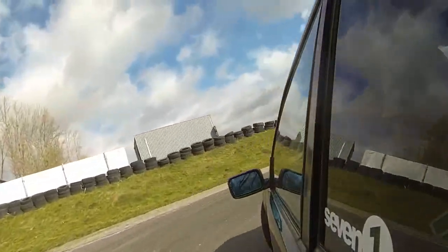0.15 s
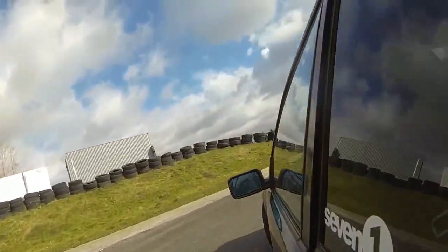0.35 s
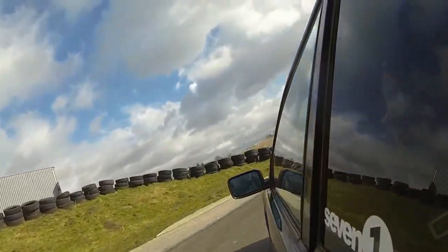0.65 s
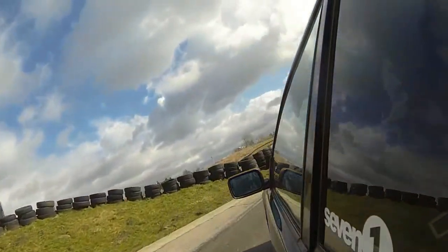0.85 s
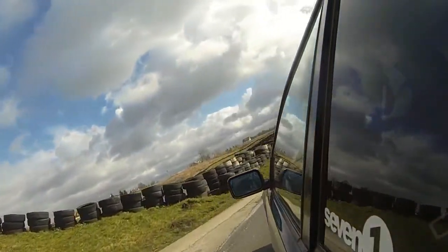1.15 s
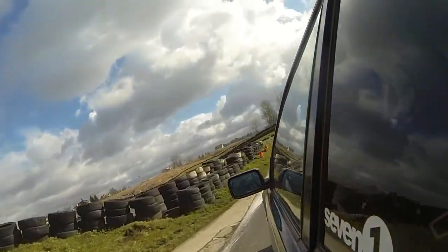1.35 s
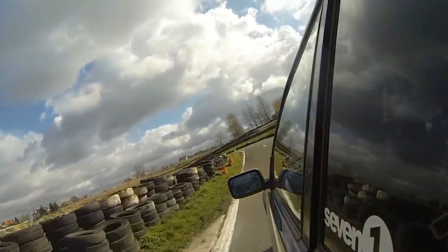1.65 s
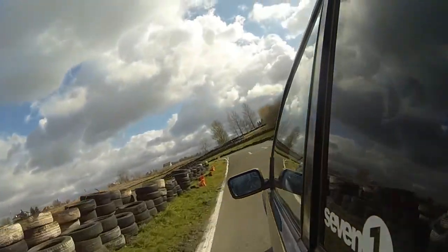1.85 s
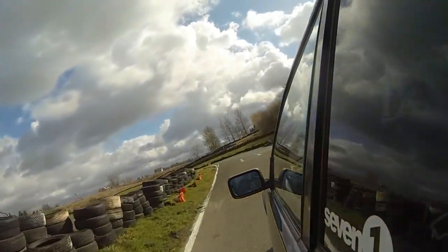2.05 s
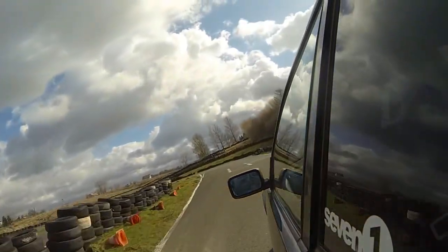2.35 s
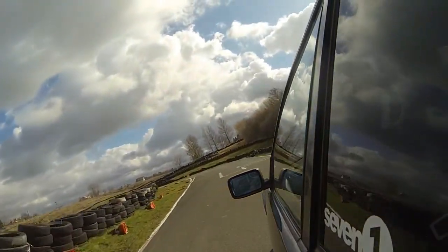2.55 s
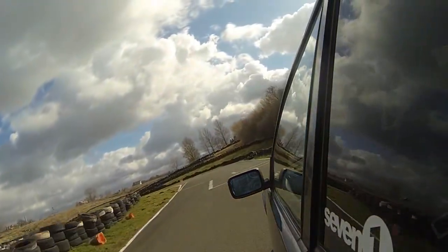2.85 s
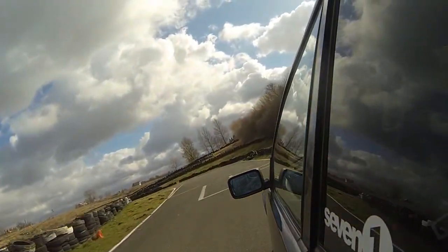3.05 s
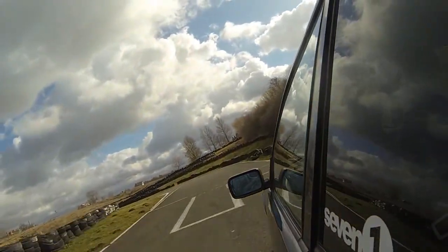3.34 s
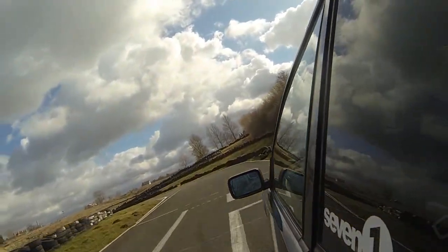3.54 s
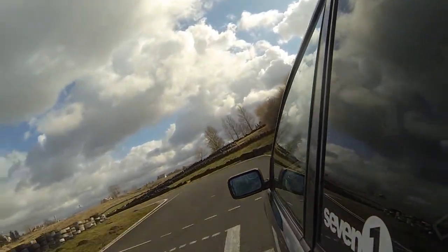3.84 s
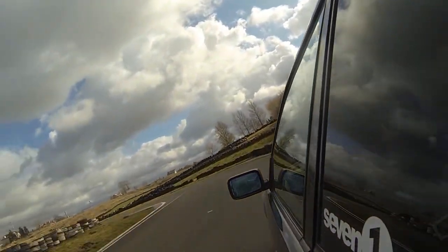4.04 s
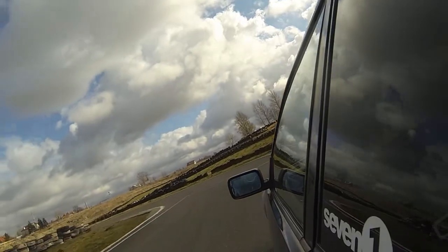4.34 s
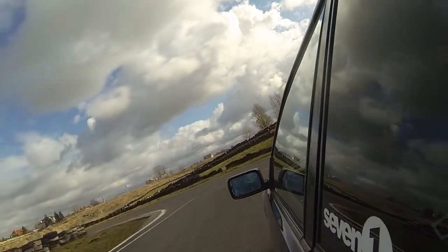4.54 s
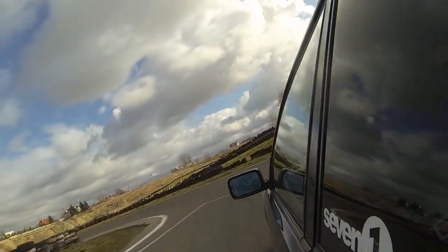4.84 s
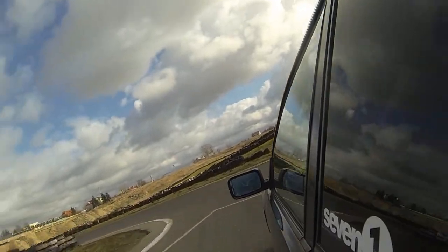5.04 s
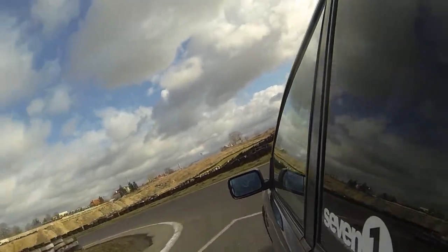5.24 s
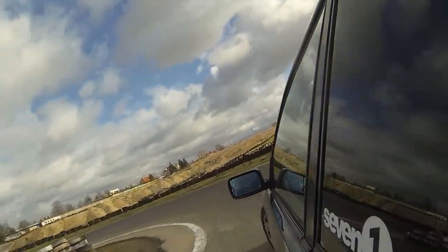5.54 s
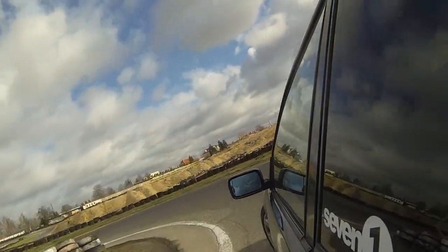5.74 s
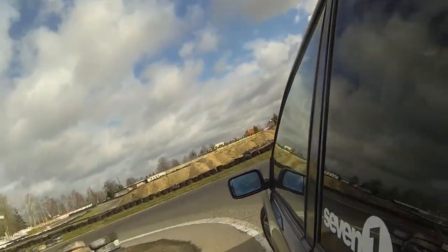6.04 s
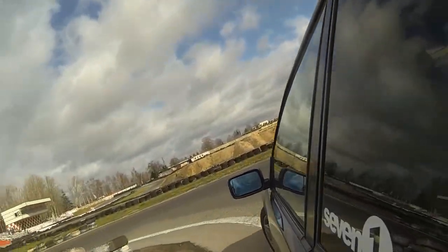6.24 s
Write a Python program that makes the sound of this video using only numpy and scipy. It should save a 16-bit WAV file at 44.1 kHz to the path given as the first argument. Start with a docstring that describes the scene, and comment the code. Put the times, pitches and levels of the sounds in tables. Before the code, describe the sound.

A straight-six race car is driven hard on a track, heard from a microphone case on its door. Deep exhaust boom, tyre roar and low wind buffeting run throughout. For the first 0.6 seconds the tyres squeal and scrub out of a bend. From about 1 second the engine climbs steadily in pitch, and the wind rushes louder, gusting most between 2 and 3.5 seconds. A few dull knocks hit the case around 2.6 seconds. At about 3.8 seconds the revs peak and the throttle closes; at 4 seconds a hard bump brings a knock and a low door thump. The engine falls in pitch, quieter, with a brief push of throttle near 5.5 seconds. From 4.7 seconds until the end at about 6.4, the tyres squeal in short, broken bursts. The mount ticks lightly now and then, and a very faint, thin whistle sits high above everything.

```python
"""On a race track, the microphone riding in a camera case on the door of a straight-six race car.
The car leaves a bend on squealing tyres, pulls up a short straight, lifts off and squeals into the next.
From close by, the exhaust booms through the body and the tyres roar through the panels. Right at the
microphone, wind rushes round the ringing case and buffets its mount; bumps knock on the case, the mount
ticks, and the hardest bump jolts the door. A faint, thin whistle sits high above it all."""
import sys
import numpy as np
from scipy import signal
from scipy.fft import rfft, irfft, next_fast_len
from scipy.io import wavfile
from scipy.ndimage import uniform_filter1d, minimum_filter1d

SR = 44100
rng = np.random.default_rng(int(sys.argv[2]) if len(sys.argv) > 2 else 0)


def materialize(psi):
    """Save the field psi as 16-bit PCM at rate SR to the path in sys.argv[1].

    A 1-D psi becomes a single channel; in a 2-D psi each row is a channel.
    """
    bounded = np.clip(np.atleast_2d(psi).T, -1, 1)
    quanta = np.round(bounded * 32767).astype(np.int16)
    wavfile.write(sys.argv[1], SR, quanta)


N = 281799
TIME = np.arange(N) / SR

# Levels in the tables are relative; each source sets its own gain.
# engine speed, all in one gear, so also the speed of the car: time_s, note_hz
EXHAUST_NOTE = [(0, 74), (.5, 75.3), (.85, 77.3), (1.3, 88.4), (2.1, 104.3), (3.1, 126), (3.55, 133.8),
                (3.8, 136.5), (4.25, 123.9), (4.8, 100.2), (5.3, 90), (5.62, 83.1), (6.39, 72.8)]
# throttle, down on the straight, lifted for the bend, then fed in briefly: time_s, load_db
THROTTLE = [(0, 1.5), (1, 0), (3.7, 1), (4.1, -17), (4.8, -14), (5.05, -7), (5.33, -8), (5.46, -1.5),
            (5.8, -8.5), (6.39, -7.5)]
# resonances of exhaust and body that the note and its octave sweep through: frequency_hz, level_db
EXHAUST_BOOM = [(70, -24), (82, -6), (91, -12.5), (104, -12), (111, -12), (116, -23), (128, -26.5),
                (136, -35.5), (152, -37.5), (161, -44.5), (168, -35), (180, -31.5), (192, -31), (212, -27),
                (226, -39), (244, -36), (258, -50), (300, -32.5)]
# weaker engine orders: note_multiple, level_db
UPPER_ORDERS = [(1.5, -49.5), (2.5, -48), (3, -43), (3.5, -49.5), (4, -51.5), (4.5, -50.5), (5, -50.5),
                (5.5, -58), (6, -51.5), (7, -63)]
# belt-driven parts whining between the orders: note_multiple, level_db
BELT_WHINES = [(6.62, -47.5), (7.2, -46)]
# resonances of the car body: centre_hz, width_hz, lift_db
BODY_PANELS = [(239, 10, 8), (339.5, 33, 4.5), (403.4, 36, 5.5), (509.6, 89, 5.5), (722, 94, 3.5),
               (922, 75, 5.5), (1075, 75, 8.5)]

# spectrum of the rolling tyres: frequency_hz, level_db
ROAR_SPECTRUM = [(100, -3.5), (170, 6.5), (230, -5), (290, -4), (400, 1), (520, -3), (700, -1), (1100, -8),
                 (1600, -25), (3000, -61.5)]
# smoother and coarser stretches of asphalt: middle_s, half_length_s, change_db
ASPHALT_PATCHES = [(0.685, 0.088, -2.5), (3.596, 0.19, 2), (4.194, 0.24, -7.5), (5.022, 0.15, 3),
                   (6.36, 0.046, -6.5)]
# tyres sliding in the bends: middle_s, half_length_s, level_db
TYRE_SLIDES = [(0.166, 0.37, -51.5), (5.347, 0.15, -49), (5.952, 0.39, -51.5)]
# spectrum of the scrubbing tread: frequency_hz, level_db
SCRUB_SPECTRUM = [(1500, -16), (2300, -0.5), (3000, -2.5), (3600, -9.5), (4200, -17), (8000, -30.5)]
# short squeals of the tread: start_s, length_s, pitch_hz, glide_hz_per_s, level_db
TYRE_SQUEALS = [(0, 0.062, 736, -900, -32.5), (0, 0.058, 1470, -400, -55), (0.059, 0.24, 851, 251, -36),
                (.065, 0.16, 1596, 115, -30.5), (0.095, 0.1, 1667, -2, -39.5), (0.198, 0.29, 1629, 3, -37),
                (0.292, 0.101, 860, 1103, -38), (0.412, .125, 860, 3, -39), (0.523, 0.12, 1594, -700, -45),
                (4.651, .31, 1655, 98, -45.5), (4.899, .05, 1630, -4, -37), (5.009, 0.057, 1620, -1, -38),
                (5.099, 0.035, 1590, 2, -34), (5.158, 0.33, 1616, -5, -41.5), (5.549, 0.14, 1601, -5, -36),
                (5.989, 0.12, 1570, -200, -33.5), (6.18, 0.14, 1606, -500, -40.5)]

# spectrum of air and blows on the case: frequency_hz, level_db
CASE_SPECTRUM = [(200, 14.5), (500, -1), (900, 7), (1200, 6.5), (1700, 8), (2200, 0), (3300, -7),
                 (4100, -16.5), (5500, -18), (8000, -31.5), (10000, -29.5), (11500, -42.5), (15500, -40.5)]
# resonances of the case round the microphone: centre_hz, width_hz, lift_db
CASE_RESONANCES = [(1369, 202, 8.5), (1572, 164, 7.5), (2904, 240, 5), (3680, 130, 5), (4520, 43, 8),
                   (4957, 400, 8.5), (6525, 160, 4.5), (7600, 720, 6), (10500, 880, -3)]
# gusts breaking on the case: middle_s, half_length_s, level_db, fizz_offset_db
CASE_GUSTS = [(.1, 0.56, -59, -3), (0.835, 0.028, -52.5, -9.5), (0.94, .07, -50, -7.5),
              (1.3, 0.29, -52, -5.5), (1.637, .07, -44.5, -7), (2.233, 0.53, -42, -7),
              (3.134, 0.4, -41.5, -7.5), (3.283, 0.098, -37, -6.5), (3.888, 0.092, -46.5, -10),
              (3.99, 0.032, -40.5, -6.5), (4.234, 0.27, -56, -5), (4.438, 0.075, -51.5, -8.5),
              (5.32, .1, -51, -11.5), (6.016, 0.32, -50.5, -10)]
# heavy buffets on the mount and the door: middle_s, half_length_s, level_db
WIND_BUFFETS = [(0.074, 0.047, -10), (0.397, 0.24, -13.5), (1.65, 0.041, -11.5), (3.21, 0.17, -14.5),
                (3.818, 0.09, -10), (3.997, 0.06, -12.5), (4.574, 0.059, -18.5), (4.844, 0.037, -10),
                (5.31, 0.15, -9.5), (5.639, 0.13, -14), (5.972, 0.14, -12.5), (6.263, 0.16, -9)]
# spectrum of the mount rocking at its one low resonance: frequency_hz, level_db
MOUNT_SPECTRUM = [(8, -35), (16, -17), (21, -11), (25, -3), (29, 3), (33, -3), (38, -9), (46, -16),
                  (70, -31), (150, -60)]
# spectrum of the drumming door: frequency_hz, level_db
DOOR_SPECTRUM = [(25, -24), (48, 4.5), (70, -2), (90, 2), (108, 3.5), (128, -1), (145, -18.5), (200, -25),
                 (400, -78.5)]

# bumps knocking on the case: start_s, level_db, decay_s
CASE_KNOCKS = [(.301, -15, .0035), (2.556, -18, .01), (2.594, -25, .011), (2.659, -24, .015),
               (2.725, -32, .008), (3.999, -14, .005), (4.923, -33.5, .018), (5.027, -31, .018),
               (5.107, -34, .016)]
# small ticks of the mount: start_s, level_db
MOUNT_TICKS = [(3.814, -48), (3.826, -47), (4.796, -60), (4.834, -55), (5.303, -48), (6.282, -51),
               (6.312, -57), (6.347, -49), (6.363, -42)]
# spectrum of those ticks: frequency_hz, level_db
TICK_SPECTRUM = [(2000, -35), (3500, -8.5), (5200, -2.5), (6300, 3.5), (7800, -4.5), (10000, -14.5),
                 (15000, -34)]
# the hardest bump jolting the door: middle_s, level_db, pitch_hz, half_length_s
DOOR_JOLT = (4, -6, 54.5, .03)


def amp(db):
    """Decibels to gain."""
    return 10 ** (np.asarray(db) / 20)


def unit_rms(x):
    """Scales to rms 1."""
    return x / np.sqrt(np.mean(x ** 2) + 1e-20)


def curve(rows):
    """A time table's value at every sample."""
    return np.interp(TIME, *np.transpose(rows))


def spectrum_db(points, hz):
    """A spectrum on a log-frequency axis, silent beyond its last point."""
    f, db = np.transpose(points)
    return np.interp(np.log(hz + 1), np.log(f), db, right=-np.inf)


def lifts(resonances, hz):
    """The dB that a set of resonances adds at each frequency."""
    return sum(db * np.exp(-2 * ((hz - f) / width) ** 2) for f, width, db in resonances)


def rolloff(ratio, order):
    """A filter skirt in dB: flat where ratio is well under 1."""
    return -10 * np.log10(1 + ratio ** (2 * order))


def filtered(x, colour):
    """Filters x by colour(hz) in dB."""
    size = next_fast_len(N)
    return irfft(rfft(x, size) * amp(colour(np.fft.rfftfreq(size, 1 / SR))), size)[:N]


def shaped(x, colour):
    """Filters x and scales it to rms 1."""
    return unit_rms(filtered(x, colour))


def noise(points):
    """Noise of rms 1 with the given spectrum."""
    return shaped(rng.standard_normal(N), lambda hz: spectrum_db(points, hz))


def wander(rate_hz, size=N):
    """Random drift of rms about 1, up to about rate_hz."""
    count, step = 2 ** 14, 18
    hz = np.fft.rfftfreq(count, step / SR)
    slow = irfft(rfft(rng.standard_normal(count)) / (1 + (hz / rate_hz) ** 2))
    return np.interp(np.arange(size), np.arange(count) * step, unit_rms(slow))


def steadied(x, span_s):
    """Takes the slow swells out of a sound, so that a level curve can lead it."""
    span = int(span_s * SR)
    power = uniform_filter1d(uniform_filter1d(x ** 2, span), span)
    return x / np.sqrt(abs(power) + 1e-6)


def swell(middle_s, half_s, squareness=2.8):
    """A rounded rise and fall, 1 at its top."""
    return np.exp(-(abs(TIME - middle_s) / half_s) ** squareness)


def swelling(rows, steady, offset_db=0):
    """A steady gain with swells on top, each shifted by offset_db; their powers add."""
    power = sum((amp(db + offset_db) * swell(middle, half)) ** 2 for middle, half, db in rows)
    return np.sqrt(steady ** 2 + power)


def burst(start_s, decay_s):
    """The envelope of a blow: sudden start, exponential fall."""
    return (TIME >= start_s) * np.exp(-abs(TIME - start_s) / decay_s)


def with_speed(cruise_db, db_per_octave, cruise_hz=100):
    """A gain that grows with the car's speed: cruise_db when the exhaust note is at cruise_hz."""
    return amp(cruise_db + db_per_octave * np.log2(curve(EXHAUST_NOTE) / cruise_hz))


def surface():
    """The gain of the roar and the drumming on each stretch of asphalt."""
    return amp(sum(db * swell(middle, half) for middle, half, db in ASPHALT_PATCHES))


def case_colour(hz):
    """The case as heard from inside, in dB: a falling spectrum lifted at its resonances."""
    return spectrum_db(CASE_SPECTRUM, hz) + lifts(CASE_RESONANCES, hz)


def engine(flutter=.0034, throb=.09, upper_rough=.75, whine_rough=.23, whine_peak_hz=100):
    """The exhaust booms through the body; rougher orders and belt whine ring the panels in passing."""
    hz, load_db = curve(EXHAUST_NOTE), curve(THROTTLE)
    phase = 2 * np.pi * np.cumsum(hz * (1 + flutter * wander(12))) / SR

    def order(multiple, unevenness):
        tone = np.sqrt(2) * np.sin(multiple * phase + 2 * np.pi * rng.random())
        return tone * (1 + unevenness * wander(18))

    boom = amp(spectrum_db(EXHAUST_BOOM, hz) + load_db) * order(1, throb)
    octave = amp(spectrum_db(EXHAUST_BOOM, 2 * hz) + 1.4 * load_db - 1) * order(2, throb)
    upper = amp(load_db - 4.5) * sum(amp(db) * order(k, upper_rough) for k, db in UPPER_ORDERS)
    belts = sum(amp(db) * order(k, whine_rough) for k, db in BELT_WHINES)
    # the whine fades as the exhaust note moves to either side of whine_peak_hz
    fade_db = .95 * np.maximum(whine_peak_hz - hz, 0) + .4 * np.maximum(hz - whine_peak_hz, 0)
    whine = amp(1 + load_db - fade_db) * belts
    ringing_upper = filtered(upper, lambda f: lifts(BODY_PANELS, f))
    ringing_whine = filtered(whine, lambda f: 1.7 * lifts(BODY_PANELS, f))
    return boom + octave + ringing_upper + ringing_whine


def road_roar(patchy_db=2):
    """Tyres roll, heard through the panels: louder with speed and in slides, uneven with the asphalt."""
    roar = shaped(rng.standard_normal(N),
                  lambda hz: spectrum_db(ROAR_SPECTRUM, hz) + lifts(BODY_PANELS, hz))
    rolling = swelling(TYRE_SLIDES, with_speed(-38.5, db_per_octave=9), offset_db=7)
    return rolling * surface() * amp(patchy_db * wander(31)) * roar


def tyre_scrub():
    """The tread scrubs grittily over the asphalt in each slide."""
    return swelling(TYRE_SLIDES, 0) * noise(SCRUB_SPECTRUM)


def squeal(length_s, pitch_hz, glide_hz_per_s, level_db, edge_s=.012, jitter=.016, chatter_db=3):
    """Tread sticks and slips, rougher the harder it slides; a second tyre sings a little lower."""
    t = np.arange(0, length_s, 1 / SR)
    hz = pitch_hz + glide_hz_per_s * (t - length_s / 2)
    envelope = np.minimum(np.minimum(t, length_s - t) / edge_s, 1)
    rough = amp(.5 * (level_db + 34))  # 1 in a hard slide

    def tyre(centre_hz):
        unsteady_hz = centre_hz * (1 + rough * jitter * wander(59, len(t)))
        phase = 2 * np.pi * np.cumsum(unsteady_hz) / SR
        grit = rough * .45 * wander(220, len(t))  # coarse asphalt trips single slips
        chatter = amp(chatter_db * wander(42, len(t)))
        return steadied(chatter * np.sin(phase + grit), span_s=.094)

    return envelope * amp(level_db - 1.9) * (tyre(hz) + amp(-7) * tyre(.94 * hz))


def tyre_squeals():
    """The tyres squeal in short bursts, out of one bend and into the next."""
    mix = np.zeros(N)
    for start_s, *row in TYRE_SQUEALS:
        sound = squeal(*row)
        part = mix[round(start_s * SR):][:len(sound)]
        part += sound[:len(part)]
    return mix


def wind(flutter_db=1.39, crackle_db=1, split_hz=3600):
    """Eddies break on the case, right at the microphone: rush and fizz, rising with speed and in gusts."""
    steady = with_speed(-53, db_per_octave=5)
    rush_gain = swelling([(s, half, db) for s, half, db, _ in CASE_GUSTS], steady)
    fizz_gusts = [(s, half, db + fizz_db) for s, half, db, fizz_db in CASE_GUSTS]
    fizz_gain = swelling(fizz_gusts, steady * amp(-11.5))
    eddies = amp(flutter_db * wander(29))
    air = eddies * rng.standard_normal(N)
    rush = shaped(air, lambda hz: case_colour(hz) + rolloff(hz / split_hz, order=4))
    crackle = eddies * amp(crackle_db * wander(350)) * rng.standard_normal(N)
    fizz = shaped(crackle, lambda hz: case_colour(hz) + rolloff(split_hz / (hz + 1), order=6))
    return amp(13) * rush_gain * rush + amp(1) * fizz_gain * fizz


def buffeting():
    """The airstream rocks the mount and drums on the door, harder with speed and in each buffet."""
    mount_gain = swelling(WIND_BUFFETS, with_speed(-21, db_per_octave=4))
    door_gain = swelling(WIND_BUFFETS, with_speed(-22, db_per_octave=7) * surface(), offset_db=-8)
    rocking = steadied(noise(MOUNT_SPECTRUM), span_s=.069)
    drumming = steadied(noise(DOOR_SPECTRUM), span_s=.69)
    return mount_gain * rocking + door_gain * drumming


def whistle(pitch_hz=14760, level_db=-82, waver=.001):
    """A faint, thin whistle high above everything."""
    hz = pitch_hz * (1 + waver * wander(20))
    return amp(level_db) * np.sin(2 * np.pi * np.cumsum(hz) / SR)


def case_knocks(dull_hz=2150, ring_db=-3):
    """Bumps ring the whole case dully round the microphone."""
    envelope = sum(amp(db) * burst(s, decay_s) for s, db, decay_s in CASE_KNOCKS)
    blows = envelope * np.sign(rng.standard_normal(N))
    return filtered(blows, lambda hz: ring_db + case_colour(hz) + rolloff(hz / dull_hz, order=2))


def mount_ticks(decay_s=.0016):
    """The mount gives short, bright ticks."""
    return sum(amp(db) * burst(s, decay_s) for s, db in MOUNT_TICKS) * noise(TICK_SPECTRUM)


def door_jolt():
    """The hardest bump swings the door through a few low cycles."""
    middle_s, level_db, pitch_hz, half_s = DOOR_JOLT
    swing = np.sin(2 * np.pi * pitch_hz * (TIME - middle_s))
    return amp(level_db) * swell(middle_s, half_s, squareness=2) * swing


def scene():
    """Everything reaches the one microphone on the door."""
    car = engine() + road_roar() + tyre_scrub() + tyre_squeals()
    air = wind() + buffeting()
    bumps = case_knocks() + mount_ticks() + door_jolt()
    return (car + air + bumps + whistle())[None]


def record(dry, ceiling=.9, hold_samples=900, top_hz=15700):
    """Behind the microphone, a limiter holds down the biggest bass swings; soft ends, then a low-pass."""
    reduction = ceiling / np.maximum(abs(dry[0]), ceiling)
    gain = uniform_filter1d(minimum_filter1d(reduction, 2 * hold_samples), hold_samples)
    ends = signal.windows.tukey(N, .002)
    low_pass = signal.firwin(511, top_hz, window=("kaiser", 9), fs=SR)
    return signal.oaconvolve(dry * gain * ends, low_pass[None], "same")


dry = scene()
out = record(dry)
materialize(out)
```